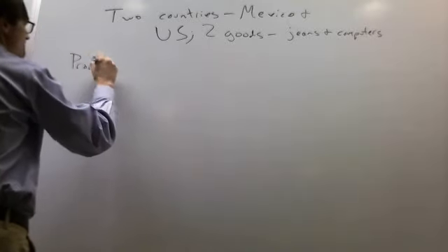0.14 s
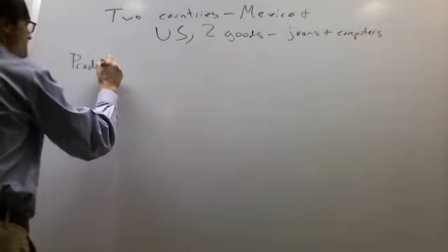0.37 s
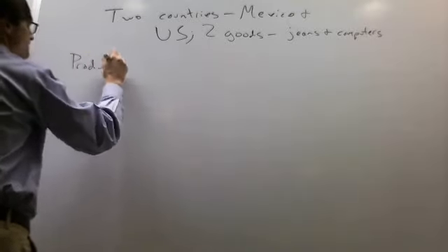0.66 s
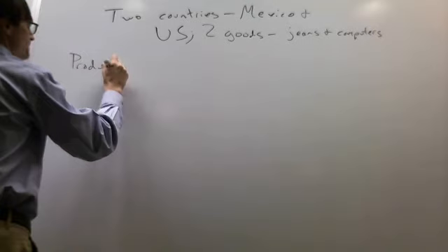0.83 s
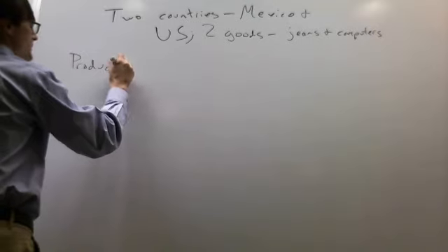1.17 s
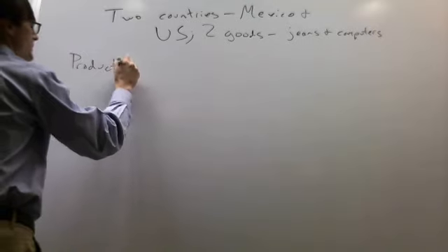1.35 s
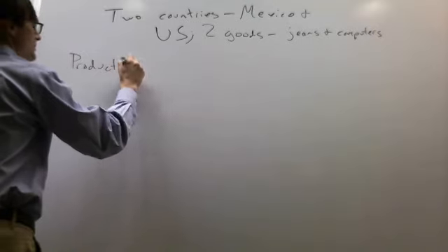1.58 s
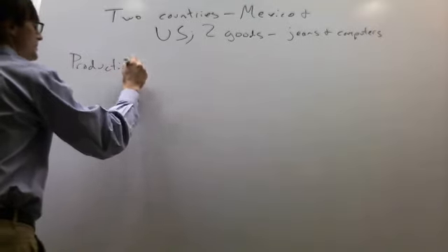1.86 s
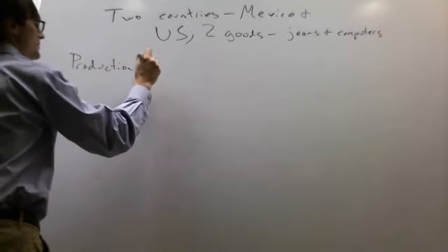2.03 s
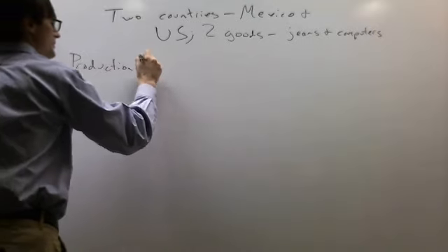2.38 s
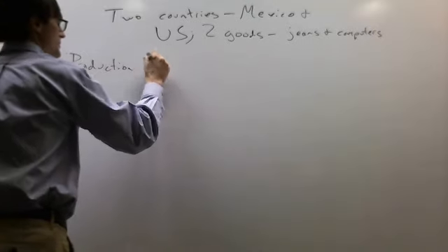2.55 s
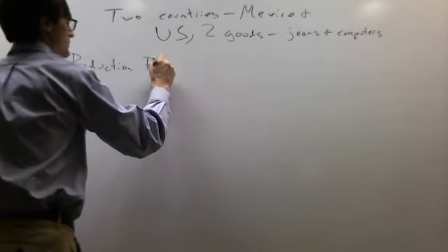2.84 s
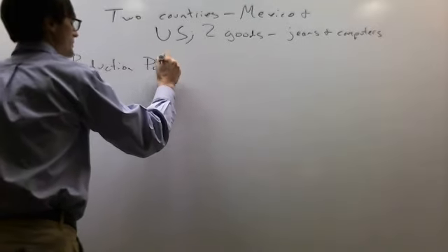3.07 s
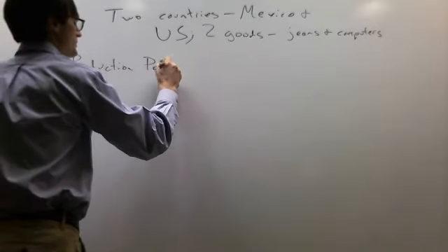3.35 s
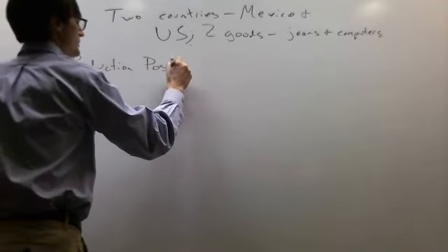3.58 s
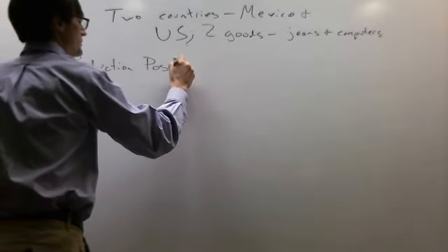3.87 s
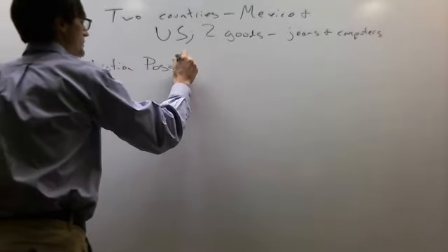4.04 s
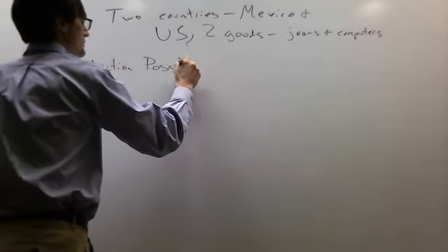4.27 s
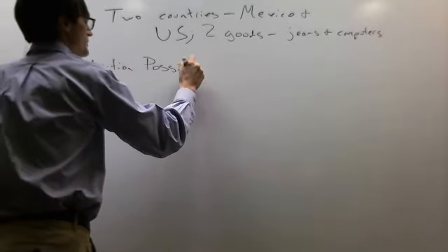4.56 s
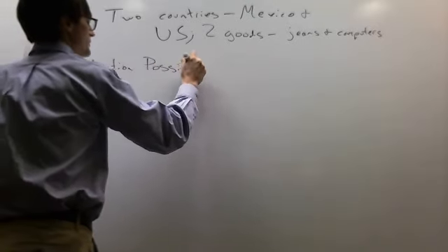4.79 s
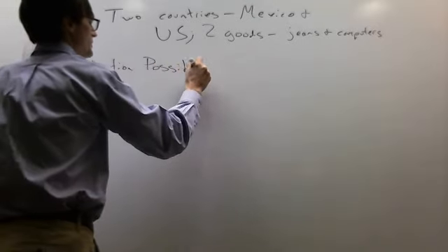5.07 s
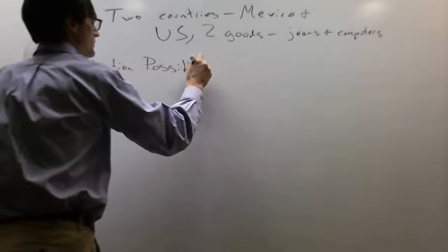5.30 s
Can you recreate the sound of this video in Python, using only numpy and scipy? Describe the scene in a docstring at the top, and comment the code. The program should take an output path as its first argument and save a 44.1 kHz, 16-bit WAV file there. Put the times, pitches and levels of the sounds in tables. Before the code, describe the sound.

A felt marker writes on a big whiteboard in a lecture room. Short, woody, hollow taps come unevenly, two to four a second, each with a brief panel ring and quick wall echoes. A pause precedes the strongest knock, near the middle; later ones turn softer and duller. Barely audible squeaks and brushing hiss accompany strokes. Steady low rumble and soft hiss stay beneath. The microphone hears the room at a moderate distance, in mono.

```python
"""A dry-erase marker taps and writes on a large whiteboard in a lecture room.
Each touch is a short knock plus a panel ring of decaying sines and noise; the modes shift along the line.
Delayed copies and a noise tail give the echoes, the far wall's return and the room.
The felt slides with low rumble and faint hiss (shaped noise); at times it squeaks (unsteady harmonics).
Behind it: steady low room rumble, as of ventilation, hiss and a thin whine."""
import sys
import numpy as np
from scipy import signal
from scipy.fft import rfft, irfft
from scipy.io import wavfile

SR = 44100
rng = np.random.default_rng(int(sys.argv[2]) if len(sys.argv) > 2 else 0)


def master_out(mix):
    """Clip the mix to full scale and print it as 16-bit PCM to the path in sys.argv[1]."""
    frames = np.transpose(np.atleast_2d(mix))
    ceiling = np.clip(frames, -1, 1)
    pcm = np.round(ceiling * 32767).astype(np.int16)
    wavfile.write(sys.argv[1], SR, pcm)


N = 239259
TIME_S = np.arange(N) / SR
AGE_S = np.arange(SR // 3) / SR  # time since a touch

# touches of the tip: start_s, knock_db, hardness_db_per_octave, hand_weight_db
TAPS = [(0.1887, -38, 0.5, -55), (0.244, -52.5, -12, -56), (0.4634, -33.5, 1.5, -58.5),
        (0.698, -33.5, -3, -65.5), (0.9468, -37, -2, -62), (1.1102, -34, 8.5, -64),
        (1.2804, -47.5, -5.5, -80), (1.4274, -38, 4.5, -63), (1.7174, -36, 5, -65),
        (2.3059, -29, -0.5, -49), (2.5628, -34.5, -1, -55), (2.875, -33, 1, -56), (3.222, -33, -1, -63.5),
        (3.571, -31, 2, -56), (3.881, -32, 7.5, -54.5), (4.0396, -35, -8, -66), (4.203, -41.5, -12.5, -64),
        (4.6383, -43, 6, -58.5), (4.8129, -42.5, -9.5, -61), (4.9707, -38.5, -10, -56.5),
        (5.1852, -43.5, -4.5, -55.5), (5.3621, -45, -8.5, -63.5)]
# tip's way along the line: time_s, place_cm
PEN_PATH = [(0, 0), (.2, 0), (1.1, 9), (1.45, 11), (1.7, 15), (2.3, 26), (2.55, 27), (3.55, 36), (4.2, 40),
            (4.65, 44), (5.4, 50)]
# short knock of the spot under the tip: resonance_hz, relative_db, crest_s, swell_tightness
KNOCK_MODES = [(177, -22.5, 0.0037, 1.2), (486, 7.5, 0.00433, 2.14), (742.8, 2.5, 0.004124, 2.07),
               (929, -9, 0.00432, 2.4), (1050, -30.5, .005, 12), (1360, -33, .003, 2.2)]
# panel modes: mode_hz, relative_db, ring_time_factor, best_place_cm, swing_with_place_db
PANEL_MODES = [(199.2, -7.5, 0.99, 88, 2), (220.8, -6.5, 0.82, 78.7, 7.5), (247.1, -2, 1, 65.2, 6),
               (291.6, -7.5, 0.54, 67.5, 5), (322, 2, 0.65, 66.2, 3.5), (334, 4, 0.88, 0.5, 4.5),
               (356.9, -5, 0.96, 21.1, 6.5), (392.3, -3.5, 1.3, 38.8, 3), (411, -7, 1.1, 16, 9.5),
               (430.7, -9, 0.72, 19, -5.5), (473.6, -3.5, 0.42, 44.3, 5.5), (498, -8, 1.2, 33.3, 3),
               (525, -7, 2.2, 38.6, -1), (536.7, 2, 0.88, 38.8, 0), (562.8, 2, 0.71, 39.5, 0.2),
               (576.8, -4, 1.4, 39.2, 4.5), (619.3, -2, 0.53, 38, -1.5), (638.4, -2, 0.81, 35.2, 5),
               (650, -10.5, 0.97, 43.3, 13.5), (694, -16, 0.68, 33.5, 5.5), (766.4, -15, 0.62, 23, 12.5),
               (834, -22.5, 0.81, 16, 1.5), (854, -16.5, 1, 21, 1.5), (867, -24.5, 1.4, 32.5, 1.5),
               (960, -26.5, 0.67, 28.5, 9)]
# dense small panel modes: freq_hz, relative_db_per_hz
WASH_SPECTRUM = [(25, -52.5), (60, -22), (170, -10), (250, 5), (420, -1), (580, 6), (700, -7.5), (820, -8),
                 (950, -9), (1150, -23), (1600, -45.5), (2500, -38), (6000, -73)]
# board's answer along the line: place_cm, ring_offset_db, bass_half_db (applied doubled), far_wall_db
BOARD_SPOTS = [(0, 2, -2, -21), (9, 2.5, 6, -25.5), (15, 2, 11, -29.5), (26.9, -1, 2, -19),
               (33.7, -1, -5, -17), (39.6, -3.5, -2, -23), (44.4, 1.5, 5.5, -28), (49.8, 0, -2, -33)]
# whole panel giving way under the hand: mode_hz, relative_db, t60_s
PUSH_MODES = [(64, -17, 0.23), (87, -13.5, 0.34), (111.8, -3, 0.16), (134.5, -3.5, 0.21),
              (152.5, 2.5, 0.13), (177.5, -1, 0.21)]
# return of the low thud: delay_s, gain_db
PUSH_ECHO = (0.09, -10)
# knock returned by frame, floor and walls: delay_s, gain_db
KNOCK_ECHOES = [(.0072, -15), (.0185, -27), (.032, -20), (.0435, -17.5), (.049, -13.5), (.0665, -18.5),
                (.076, -23)]
# return from far wall and its corners: delay_s, gain_db (added to far_wall_db)
FAR_WALL = [(0.1115, 0.5), (0.119, -5.5), (0.128, -1.5)]
# room's late tail: freq_hz, relative_db_per_hz
ROOM_SPECTRUM = [(80, -33), (250, -4.5), (380, -1.5), (480, -4), (590, 8.5), (700, 2), (820, -5),
                 (1000, -13.5), (3000, -36)]
# stick-slip squeaks: start_s, length_s, pitch_hz, level_db, second_harmonic_db
SQUEAKS = [(0.459, 0.031, 1720, -65, -14), (0.475, 0.047, 1714, -63, 0), (1.11, 0.048, 1860, -74, -13),
           (1.433, 0.028, 1436, -76, -11), (2.872, .025, 1803, -78.5, -3), (3.882, 0.018, 1550, -72, -21)]
# quick hissing strokes: start_s, length_s, centre_hz, crest_level_db
STROKES = [(0, 0.49, 2780, -82.5), (0.117, 0.27, 5360, -74.5), (0.465, 0.023, 5170, -70.5),
           (0.713, 0.09, 5400, -81.5), (2.296, 0.088, 4300, -76.5), (2.824, 0.11, 5300, -81.5),
           (3.101, .1, 5700, -82), (3.105, .09, 7900, -90), (4.225, 0.15, 3940, -81),
           (4.231, 0.14, 5500, -80), (4.964, 0.11, 5170, -83.5), (5.28, 0.041, 5400, -82)]
# low rumble of the room and of the sliding felt: freq_hz, relative_db_per_hz
RUMBLE_SPECTRUM = [(25, -46.5), (65, -19.5), (80, -23.5), (110, -7), (150, -12), (195, -2), (225, -7),
                   (285, 1.5), (370, -11.5), (470, -8.5), (660, -18.5), (920, -22), (1500, -33.5),
                   (3000, -54.5)]
# steady background hiss: freq_hz, relative_db_per_hz
AIR_SPECTRUM = [(20, -12), (100, 9.5), (400, 13.5), (1000, 6), (2000, 1), (3000, -2), (4500, -4.5),
                (5600, 0.5), (6900, -4), (7500, -12.5), (9000, -19), (12000, -18.5)]

USUAL_KNOCK_DB, USUAL_WEIGHT_DB = -35, -60
# ring: louder under a strong knock and heavy hand, longer after a strong knock
RING_DB, RING_DB_PER_KNOCK_DB, RING_DB_PER_WEIGHT_DB = -46, 0.66, 0.25
RING_T60_S, T60_DOUBLING_DB = 0.2, 24  # t60 at the usual knock; knock rise that doubles it
FAR_RING_DB, FAR_TILT_DB_PER_OCTAVE = -4.5, -1  # far wall: weaker ring, knock tilted
SLIDE_S = 0.18  # slide from each touch
AIR_DB, WHINE_DB, WHINE_HZ = -74, -105, 8000
LOWPASS_HZ = 12000


def amp(db):
    """Decibels to gain."""
    return 10 ** (np.asarray(db) / 20)


def unit(x):
    """Scales to rms one."""
    return x / np.sqrt(np.mean(x ** 2) + 1e-20)


def unit_start(x, span_s):
    """Scales a touch's sound to rms one over its first span_s."""
    return x / np.sqrt(np.mean(x[AGE_S < span_s] ** 2))


def add(mix, start_s, sound):
    """Mixes a sound in at start_s."""
    part = mix[max(round(start_s * SR), 0):][:len(sound)]
    part += sound[:len(part)]


def noise(spectrum, size):
    """Unit-rms noise through (Hz, dB) points, interpolated over log frequency."""
    hz, db = np.transpose(spectrum)
    freq_hz = np.fft.rfftfreq(size, 1 / SR)
    gain = amp(np.interp(np.log(freq_hz + 1), np.log(hz), db))
    return unit(irfft(rfft(rng.standard_normal(size)) * gain, size))


def band(centre_hz, sigma_hz, size):
    """Unit-rms noise in one Gaussian band."""
    freq_hz = np.fft.rfftfreq(size, 1 / SR)
    bell = np.exp(-.5 * ((freq_hz - centre_hz) / sigma_hz) ** 2)
    return unit(irfft(rfft(rng.standard_normal(size)) * bell, size))


def dying(rise_s, hold_s, t60_s, span_s=0.34, steepening=1.65):
    """Swells, holds while waves cross the panel, then dies ever faster; rms one over span_s."""
    swell = 1 - np.exp(-(AGE_S / rise_s) ** 2)
    decay = amp(-60 * (np.hypot(AGE_S, hold_s) / t60_s) ** steepening)
    return unit_start(swell * decay, span_s)


def bass_lift(hz, bass_half_db, bass_hz=420):
    """Bass fullness in dB, fading towards the treble."""
    return bass_half_db * np.exp(-(hz / bass_hz) ** 2) * 2


def taps(wash_db=-12):
    """Each touch excites knock, tick, panel ring and low push; surfaces and room send them back."""
    out = np.zeros(N)
    places_cm, *answers = np.transpose(BOARD_SPOTS)
    push_delay_s, push_echo_db = PUSH_ECHO
    for start_s, knock_db, hardness_db, weight_db in TAPS:
        place_cm = np.interp(start_s, *np.transpose(PEN_PATH))
        spot_db, bass_half_db, far_db = (np.interp(place_cm, places_cm, column) for column in answers)
        force_db = knock_db - USUAL_KNOCK_DB
        ring_db = RING_DB + spot_db + RING_DB_PER_KNOCK_DB * force_db
        ring_db += RING_DB_PER_WEIGHT_DB * (weight_db - USUAL_WEIGHT_DB)
        t60_s = RING_T60_S * 2 ** (force_db / T60_DOUBLING_DB)

        blow = amp(knock_db) * knock(hardness_db)
        modes = ring(place_cm, hardness_db, bass_half_db, t60_s)
        panel = modes + amp(wash_db) * wash(bass_half_db, t60_s)
        tap = blow + amp(ring_db) * panel
        thud = amp(weight_db) * push()
        add(out, start_s, tap + room(tap, t60_s) + thud)
        add(out, start_s, tick(knock_db, hardness_db))

        far_blow = amp(knock_db) * knock(hardness_db + FAR_TILT_DB_PER_OCTAVE)
        returned = far_blow + amp(ring_db + FAR_RING_DB) * panel
        for delay_s, gain_db in FAR_WALL:
            add(out, start_s + delay_s, amp(far_db + gain_db) * returned)
        add(out, start_s + push_delay_s, amp(push_echo_db) * thud)
        for delay_s, gain_db in KNOCK_ECHOES:
            add(out, start_s + delay_s, amp(gain_db) * blow)
    return out


def knock(hardness_db, span_s=0.0061):
    """A few cycles of bending wave; a harder touch favours the higher resonances."""
    out = np.zeros(len(AGE_S))
    pivot_hz = KNOCK_MODES[1][0]
    for hz, db, crest_s, tightness in KNOCK_MODES:
        swell = (AGE_S / crest_s * np.exp(1 - AGE_S / crest_s)) ** tightness
        gain = amp(db + hardness_db * np.log2(hz / pivot_hz))
        out += gain * swell * np.cos(2 * np.pi * hz * (AGE_S - crest_s))
    return unit_start(out, span_s)


def tick(knock_db, hardness_db, offset_db=-39, centre_hz=1200, db_per_hardness=0.79):
    """The tip's own short noise band, louder with hardness."""
    burst = band(centre_hz, 370, len(AGE_S))
    burst = burst * dying(rise_s=0.0052, hold_s=.004, t60_s=0.063, span_s=0.021)
    return amp(knock_db + offset_db + db_per_hardness * hardness_db) * burst


def ring(place_cm, hardness_db, bass_half_db, t60_s, wave_cm=65, ref_hz=400, tilt_share=0.24, span_s=0.083):
    """Panel modes, each as strong as its standing wave is under the tip."""
    out = np.zeros(len(AGE_S))
    for hz, db, time_factor, best_cm, swing_db in PANEL_MODES:
        wavelength_cm = wave_cm * np.sqrt(ref_hz / hz)  # bending waves: 1 / sqrt(frequency)
        angle = 2 * np.pi * (place_cm - best_cm) / wavelength_cm
        tilt_db = tilt_share * hardness_db * np.log2(hz / ref_hz)
        gain = amp(db + swing_db * np.cos(angle) + tilt_db + bass_lift(hz, bass_half_db))
        decay = dying(rise_s=0.011, hold_s=0.013, t60_s=t60_s * time_factor)
        out += gain * decay * np.sin(2 * np.pi * hz * AGE_S - angle)
    return unit_start(out, span_s)


def wash(bass_half_db, t60_s):
    """Panel modes too dense to tell apart: shaped, dying noise."""
    colour = [(hz, db + bass_lift(hz, bass_half_db)) for hz, db in WASH_SPECTRUM]
    return noise(colour, len(AGE_S)) * dying(rise_s=0.0046, hold_s=0.03, t60_s=0.76 * t60_s)


def push(span_s=0.065):
    """The panel's lowest modes give way: a short soft thud."""
    out = np.zeros(len(AGE_S))
    for k, (hz, db, t60_s) in enumerate(PUSH_MODES):
        decay = dying(rise_s=0.0046, hold_s=0.032, t60_s=t60_s)
        phase = rng.normal(0, 1.0)
        out += (-1) ** k * amp(db) * decay * np.sin(2 * np.pi * hz * AGE_S + phase)
    return unit_start(out, span_s)


def room(tap, t60_s, late_db=-13, time_factor=0.73):
    """The room spreads each tap's colour into a late-building tail, strongest in the midrange."""
    decay = dying(rise_s=0.036, hold_s=0.018, t60_s=time_factor * t60_s, steepening=2.1)
    tail = noise(ROOM_SPECTRUM, len(AGE_S)) * decay
    return amp(late_db) * np.std(tap) * unit(signal.fftconvolve(tap, tail)[:len(AGE_S)])


def squeaks(jitter=0.061, jitter_hz=260, rasp=0.87, rasp_hz=190, third_db=-15, echo_db=-10):
    """Felt sticks and slips at unsteady rate and strength: a rough tone, two overtones, short tail."""
    out = np.zeros(N)
    for start_s, length_s, hz, db, second_db in SQUEAKS:
        size = int(length_s * SR)
        rate_hz = hz * (1 + jitter * band(0, jitter_hz, size))
        phase = 2 * np.pi * np.cumsum(rate_hz) / SR
        grip = 1 + rasp * band(rasp_hz, rasp_hz / 2, size)
        overtones = np.sin(2 * phase) + amp(third_db) * np.sin(3 * phase)  # third_db is re the second
        tone = grip * np.sin(phase) + amp(second_db) * overtones
        add(out, start_s, amp(db) * unit(tone) * signal.windows.tukey(size, .6))
    tail = rng.standard_normal(len(AGE_S)) * dying(rise_s=0.0047, hold_s=.005, t60_s=0.11)
    return out + amp(echo_db) * signal.fftconvolve(out, tail / np.linalg.norm(tail))[:N]


def strokes(sigma_hz=600, grain_db=2):
    """Felt fibres brush the gloss: grainy hiss, half-sine swell for the stroke's speed."""
    out = np.zeros(N)
    for start_s, length_s, hz, db in STROKES:
        size = int(length_s * SR)
        hiss = band(hz, sigma_hz, size) * amp(grain_db * band(0, 120, size))
        swell = np.sin(np.linspace(0, np.pi, size))
        add(out, start_s, amp(db) * unit(hiss) * swell)
    return out


def rumble(room_db=-68.5, slide_db=-13, uneven_db=2.5):
    """Uneven low room rumble, as of ventilation, plus felt rumble after each touch, more under a heavy hand."""
    level = np.full(N, amp(room_db))
    for start_s, _, _, weight_db in TAPS:
        add(level, start_s, amp(weight_db + slide_db) * np.hanning(int(SLIDE_S * SR)))
    return noise(RUMBLE_SPECTRUM, N) * level * amp(uneven_db * band(0, 38, N))


def hiss_and_whine():
    """Steady shaped-noise hiss plus a faint electrical whine, one sine."""
    whine = np.sin(2 * np.pi * WHINE_HZ * TIME_S)
    return amp(AIR_DB) * noise(AIR_SPECTRUM, N) + amp(WHINE_DB) * whine


def scene():
    """Sums all sources to one channel."""
    return (taps() + squeaks() + strokes() + rumble() + hiss_and_whine())[None]


def record(dry):
    """Band limit: linear-phase lowpass."""
    lowpass = signal.firwin(511, LOWPASS_HZ, window=("kaiser", 9), fs=SR)
    return signal.oaconvolve(dry, lowpass[None], "same")


dry = scene()
out = record(dry)
master_out(out)
```